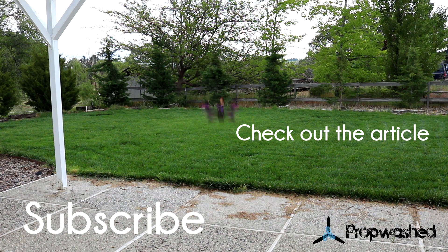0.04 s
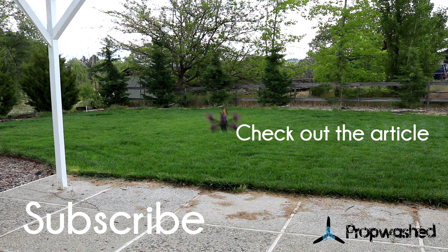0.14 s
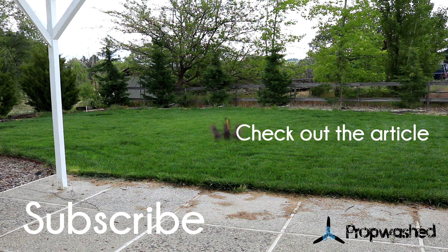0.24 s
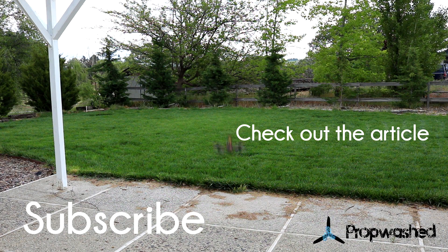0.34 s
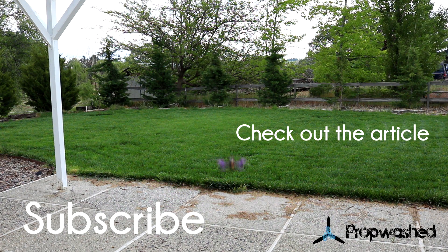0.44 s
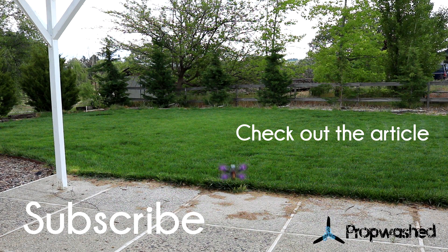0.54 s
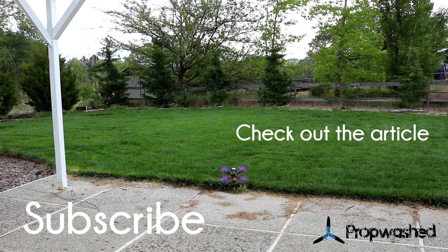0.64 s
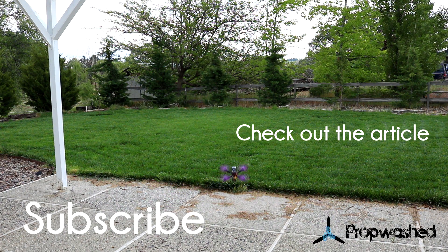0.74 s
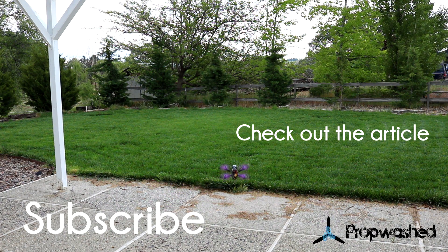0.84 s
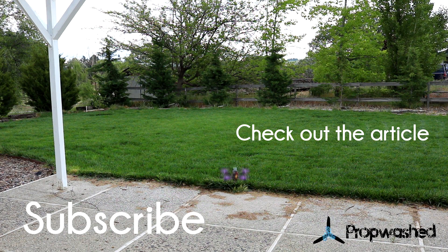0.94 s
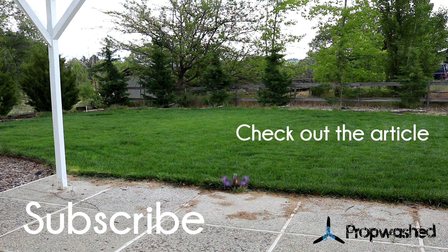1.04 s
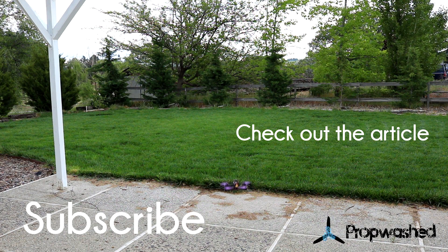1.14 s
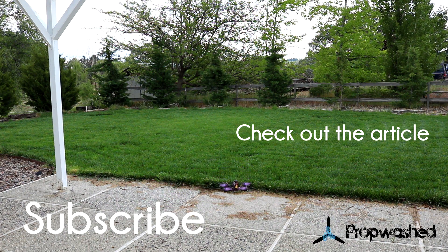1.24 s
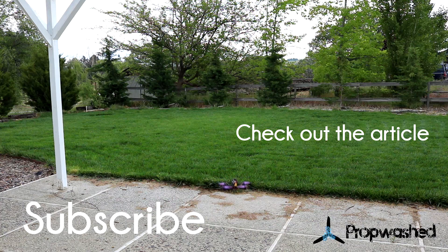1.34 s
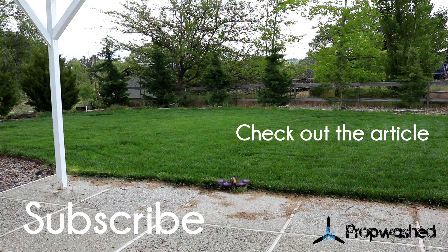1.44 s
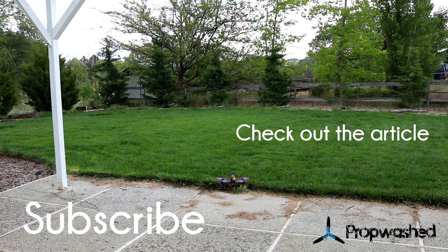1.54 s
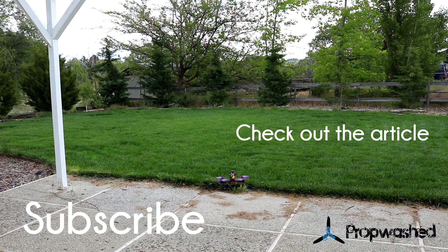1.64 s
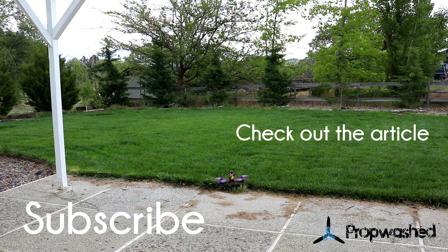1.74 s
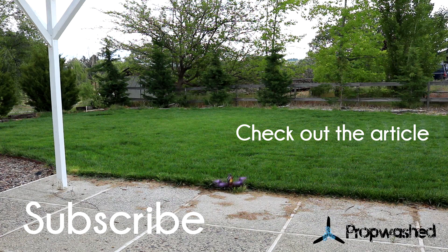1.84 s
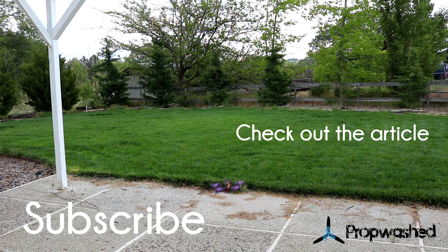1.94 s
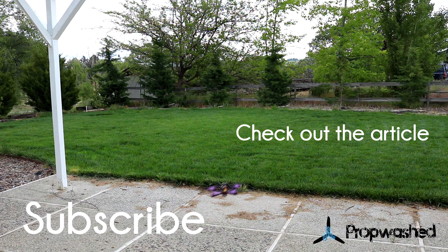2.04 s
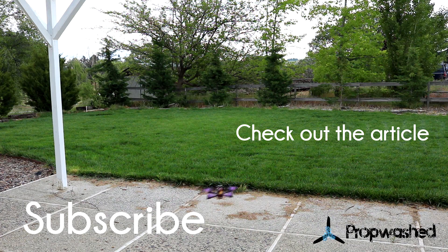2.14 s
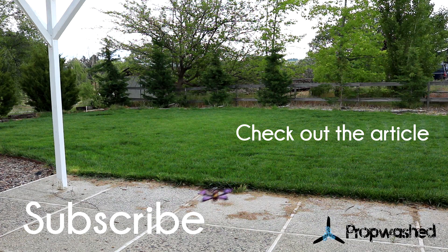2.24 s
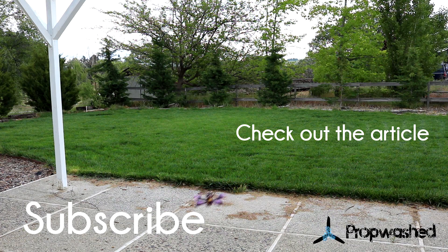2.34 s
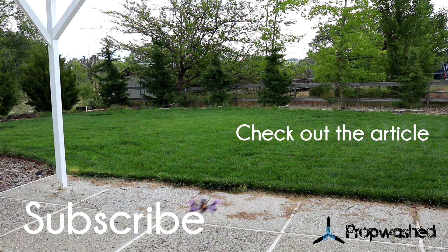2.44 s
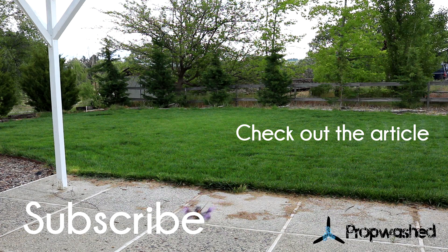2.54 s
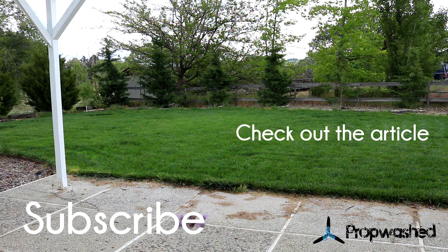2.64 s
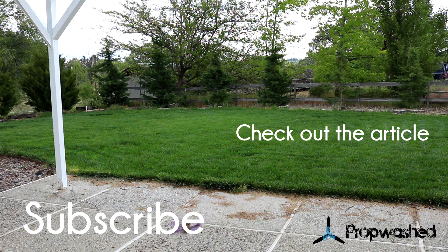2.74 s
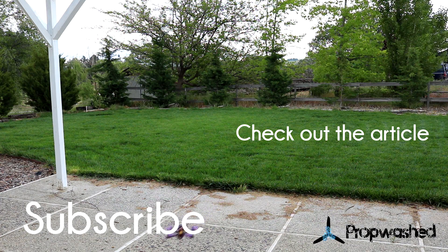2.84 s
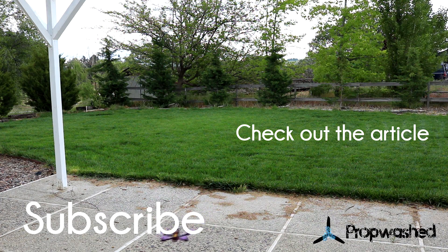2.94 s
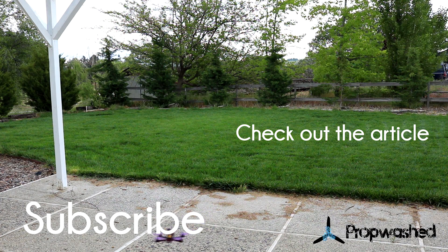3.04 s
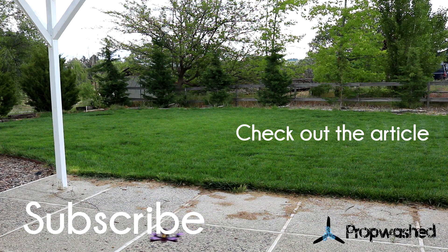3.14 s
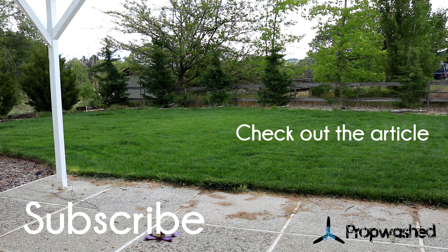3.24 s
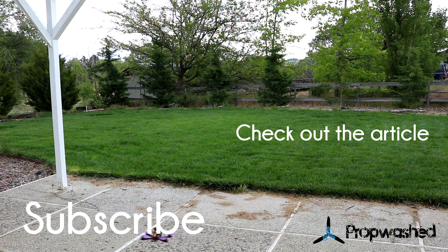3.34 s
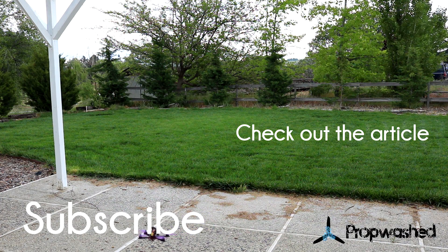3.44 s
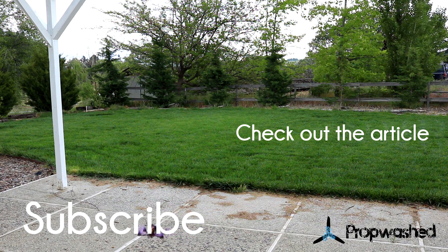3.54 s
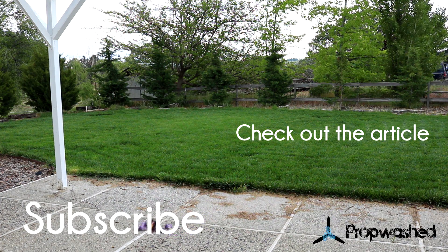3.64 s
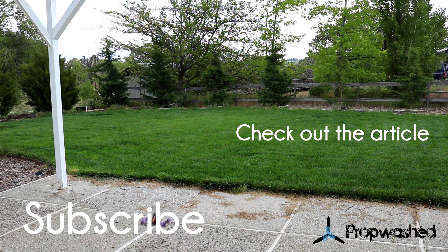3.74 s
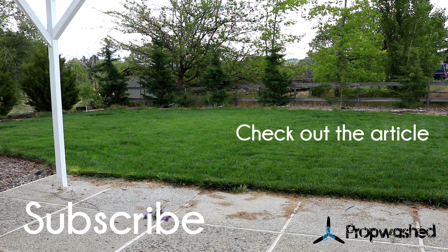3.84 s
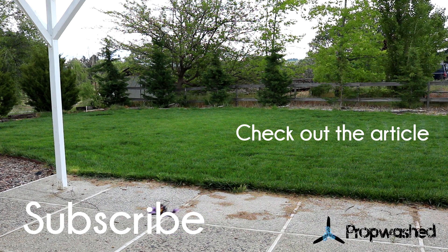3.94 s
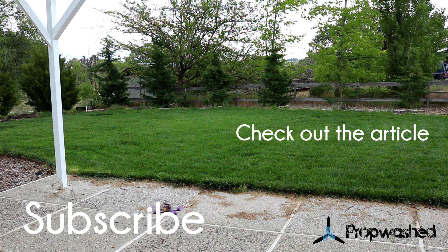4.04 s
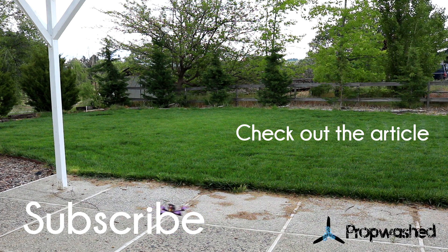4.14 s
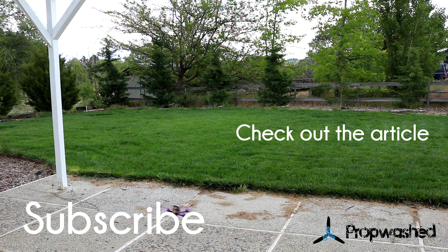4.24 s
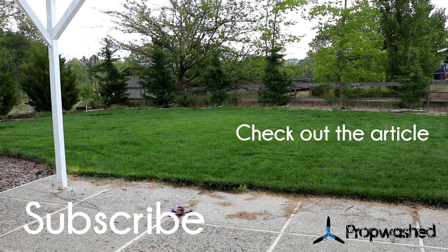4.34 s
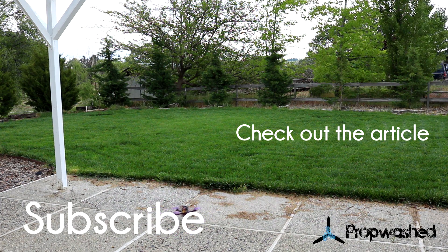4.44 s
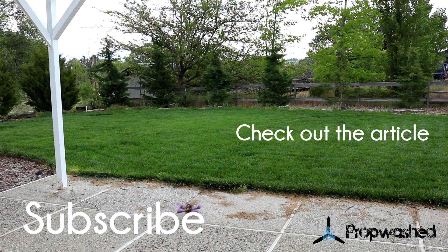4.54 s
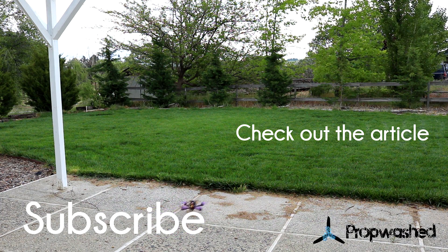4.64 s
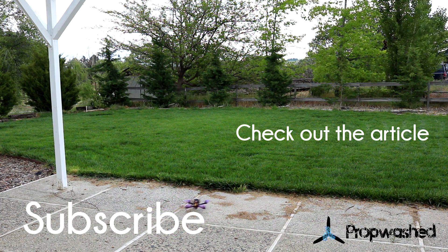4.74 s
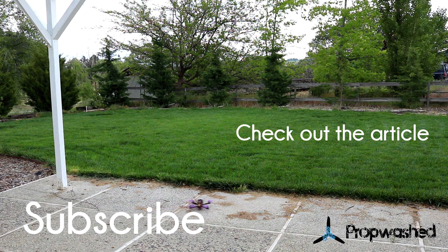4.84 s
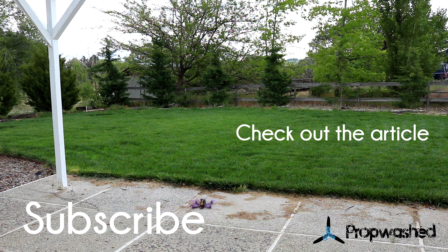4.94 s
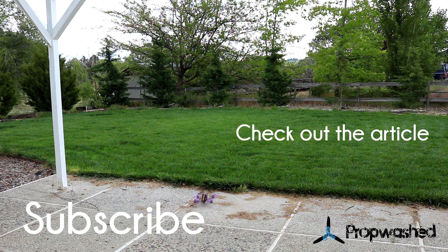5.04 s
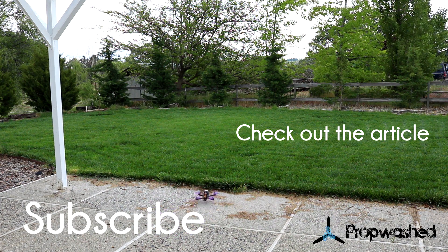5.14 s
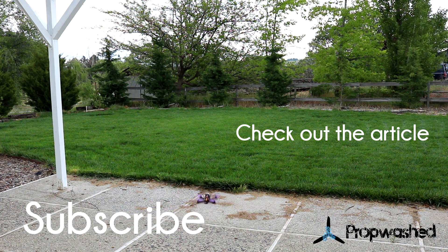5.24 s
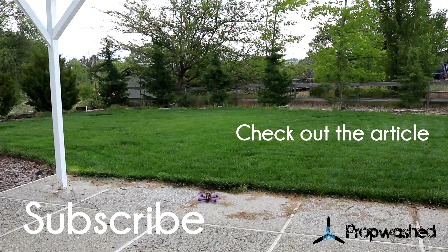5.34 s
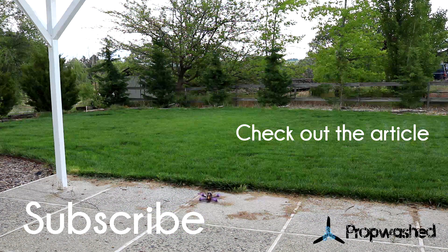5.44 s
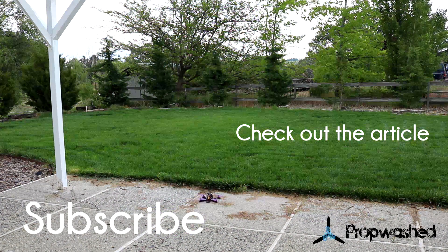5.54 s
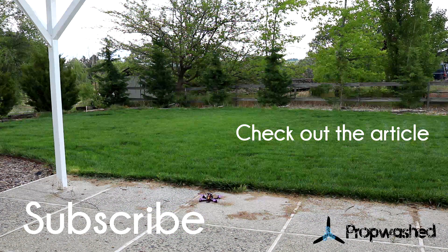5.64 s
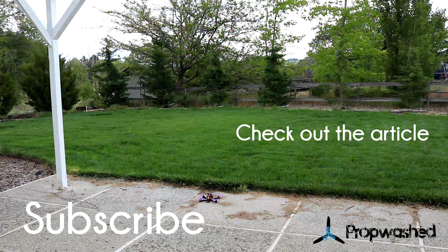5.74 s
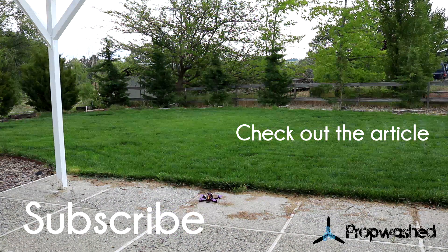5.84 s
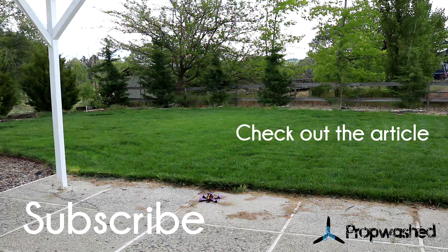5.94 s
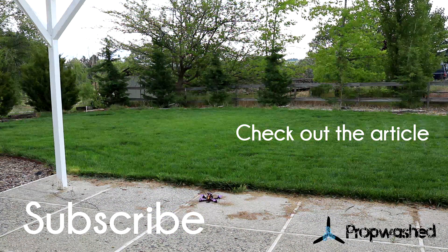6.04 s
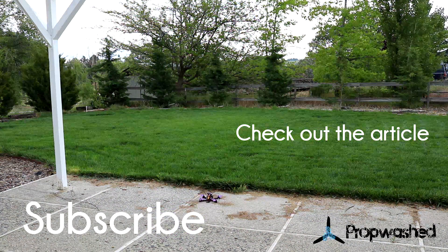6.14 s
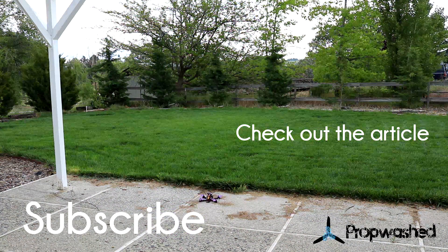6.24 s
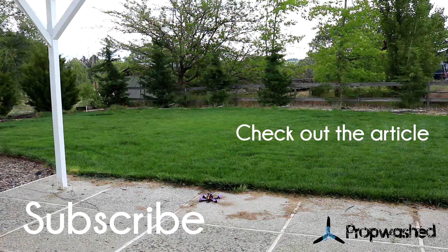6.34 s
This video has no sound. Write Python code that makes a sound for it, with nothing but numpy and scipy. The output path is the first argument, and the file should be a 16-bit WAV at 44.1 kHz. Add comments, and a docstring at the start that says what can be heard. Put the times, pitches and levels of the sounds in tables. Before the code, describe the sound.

A small drone buzzes and hisses with wavering pitch outdoors, then scuffs and clatters down onto paving as its motors stop.

```python
"""A small drone lands on a patio.

Four rotors with four blades each buzz and hiss in over a lawn, then hover low over the paving.
They drift apart in speed, so their tones throb against each other. At touchdown the blades scuff
the paving and the frame bounces twice, ringing. A quiet yard with a distant bird remains."""
import sys
import numpy as np
from scipy import signal
from scipy.fft import rfft, irfft
from scipy.io import wavfile
from scipy.ndimage import uniform_filter1d, map_coordinates

SR = 44100
rng = np.random.default_rng(int(sys.argv[2]) if len(sys.argv) > 2 else 0)


def store_pcm(level_fs):
    """Save levels as 16-bit WAV."""
    pcm = np.round(np.clip(level_fs, -1, 1) * 32767).astype(np.int16)
    wavfile.write(sys.argv[1], SR, np.atleast_2d(pcm).T)


N = 281799


def amp(db):
    """Turns decibels into a number to multiply by."""
    return 10 ** (np.asarray(db) / 20)


def evened(x):
    """Scales a signal to an average power of 1."""
    return x / np.sqrt(np.mean(x ** 2) + 1e-20)


def read(points, hz):
    """Looks up a table by frequency, on a scale of octaves."""
    f, value = np.transpose(points)
    return np.interp(np.log(hz + 1), np.log(f + 1), value)


def track(rows, t):
    """Looks up each column of a table at the times t."""
    s, *columns = np.transpose(rows)
    return [np.interp(t, s, c) for c in columns]


def add(mix, s, sound):
    """Mixes a sound in at s seconds."""
    part = mix[round(s * SR):][:len(sound)]
    part += sound[:len(part)]


def wander(t, hz):
    """A smooth random wobble that changes about hz times a second."""
    steps = signal.convolve(rng.standard_normal(5200), np.hanning(9), "same")
    return np.interp(t * hz * 4, np.arange(5200), evened(steps))


def coloured(x, shape):
    """Gives noise the bass and treble of a table, at power 1."""
    size = x.shape[-1]
    return evened(irfft(rfft(x) * amp(read(shape, np.fft.rfftfreq(size, 1 / SR))), size))


# How often a blade passes on the two middle rotors: t/s, f/Hz
THROTTLE = [(0, 779), (.04, 771), (.075, 910), (.11, 797), (.22, 520.5), (.29, 393.8), (.45, 726),
            (.55, 896), (.63, 923.5), (.72, 873), (.8, 742.6), (.93, 408), (1.06, 681), (1.14, 731.3),
            (1.25, 698), (1.5, 613.4), (1.8, 530.7), (1.87, 554.3), (2.01, 664), (2.1, 657), (2.24, 580),
            (2.35, 549), (2.6, 620.2), (2.95, 642), (3.08, 634), (3.25, 575), (3.36, 584), (3.55, 650),
            (3.78, 609), (4.03, 529.2), (4.32, 620), (4.52, 645.3), (4.72, 516.6), (4.92, 453.6),
            (4.96, 764.3), (5.16, 389)]
# Steering spreads the speeds: t/s, fastest rotor above the middle/%, slowest below/%
STEERING = [(0, 5.8, 2.3), (.04, 12, 7), (.075, 3.5, 23.2), (.115, 3.17, 3), (.2, 10, 9), (.29, 15, 9),
            (.45, 8.5, 12), (.62, 3.9, 11.6), (.74, 3, 8), (.8, 3.8, 10.5), (.93, 6.7, 6.34),
            (1.1, 1.87, 2.92), (1.38, 6.5, 4.1), (1.85, 2.08, 0.87), (2.03, 3.15, 2.82), (2.4, 1, 0.98),
            (3., 1.91, 2.78), (3.27, 2, 1), (3.46, 10, 2.97), (3.9, 4.4, 4.66), (4.12, 2.35, 6.94),
            (4.5, 2.55, 4.9), (4.92, 3.67, 2.8), (4.96, 14.3, 16.7), (5.16, 12, 16)]
# Rotors get unsteady in their own stirred-up air: t/s, raggedness/0-1
RAGGED_AIR = [(0, .35), (.13, .4), (.25, .9), (.42, .95), (.6, .5), (.72, .5), (.85, .8), (1., .75),
              (1.08, .38), (1.6, .55), (1.9, .5), (2.05, .3), (3., .3), (3.3, .5), (3.55, .65), (4.4, .75),
              (4.7, .95), (5., 1.)]
# Loudness at hover speed as the drone tilts, comes and goes:
# t/s, overall level/dB, extra for the tone/dB, extra for overtones/dB, their slope/dB per octave
NEARNESS = [(0, -35, -5.5, -6.5, -3), (.06, -36.5, -8.5, -7, -5), (.13, -38, -1, -6.5, -2),
            (.25, -39, -17.5, -4.5, -2), (.32, -37, -20, -9, -12), (.42, -39, -16.5, -12.5, 6),
            (.47, -38, -9, -6, 1.5), (.54, -36.5, -14, -10.5, 1), (.77, -42.5, -4.5, -4, 1.5),
            (.83, -40.5, -12.5, -10, -3), (1.02, -37.5, -12, -12.5, -1.5), (1.08, -41, -6, -6.5, 2),
            (1.34, -39, -7.5, -7.5, -3), (1.7, -41, -15, -10, 0.5), (2.1, -40, -10.5, -10, 0),
            (2.5, -39.5, -7, -9, 0.5), (2.7, -38, -3.5, -6, 0), (2.9, -36, -12, -9, -0.5),
            (3.08, -37.5, -6, -8.5, -3), (3.25, -38, -10.5, -6.5, -2), (3.45, -37.5, -12, -6, -0.5),
            (3.7, -40, -13, -10, 1), (3.9, -41, -20.5, -11.5, 1), (4.3, -37.5, -16.5, -8, -2.5),
            (4.75, -40, -23, -3.5, -2.5), (4.92, -38.5, -17, -5, -1.5), (5., -38, -6.5, -1.5, 1),
            (5.14, -46, -50, 3, -7.5)]
BLADES, HOVER_HZ, INERTIA_S = 4, 620, .02
SPEED_DB_PER_OCTAVE = 13.5  # faster rotors are louder


def rotors():
    """Four rotors chop the air at slightly different rates; returns their tones and their hiss."""
    t = np.arange(round(THROTTLE[-1][0] * SR)) / SR
    middle = uniform_filter1d(track(THROTTLE, t)[0], round(INERTIA_S * SR), mode="nearest")
    above, below = track(STEERING, t)
    ragged = track(RAGGED_AIR, t)[0]
    level_db, tone_db, lift_db, slope_db = track(NEARNESS, t)
    swells_db = [lift_db + 1.3 * wander(t, 9) for _ in range(17)]  # each overtone swells on its own
    fast, slow = middle * (1 + above / 100), middle * (1 - below / 100)
    drifting = middle * (1 + .025 * ragged * wander(t, 3))
    tone, whine, shake, pulsing = np.zeros((4, len(t)))
    for hz, db in [(fast, -1.5), (middle, .1), (drifting, -6), (slow, -2.5)]:
        unsteady_hz = hz * (1 + .035 * ragged ** 3 * wander(t, 45))
        phase = 2 * np.pi * (np.cumsum(unsteady_hz) / SR + rng.random())
        tone += amp(db + 4.1 * ragged * wander(t, 5.2)) * np.cos(phase)
        whine += amp(db) * blade_overtones(t, hz, phase, ragged, swells_db, slope_db)
        shake += amp(db) * shaft_shake(t, middle, phase)
        whine += amp(db) * motor_whine(t, hz, phase, ragged)
        pulsing += np.cos(phase)
    whine *= amp(-6 * ragged ** 3)
    level = amp(level_db + SPEED_DB_PER_OCTAVE * np.log2(middle / HOVER_HZ))
    level *= np.clip((t[-1] - t) / .095, 0, 1)  # the motors stop after touchdown
    shake *= np.clip((t[-1] - t) / .28, 0, 1)
    return level * (amp(tone_db) * tone + whine) + shake, level * air_hiss(t, ragged, pulsing)


# Strength of the blade overtones: f/Hz, level/dB
OVERTONES = [(900, -6), (1300, -1.5), (2000, -2), (2700, -.5), (3500, -0.5), (4300, -1.5), (5200, -3.5),
             (6200, -6), (8000, -8), (11000, -25)]
# Sound bouncing off the ground as the drone comes in low: t/s, delay/ms, share of the direct sound
GROUND_BOUNCE = [(0.9, .41, 0), (1.08, .41, .75), (1.4, .42, .45), (1.8, .55, .3), (2.05, .58, .7),
                 (2.3, .62, .2), (2.5, .62, 0)]


def blade_overtones(t, hz, phase, ragged, swells_db, slope_db):
    """The buzz: multiples of the blade rate flutter in gusts, the high ones most."""
    gust_clock = np.cumsum(.5 + 1.5 * ragged ** 2) / SR  # runs faster in ragged air
    delay_ms, share = track(GROUND_BOUNCE, t)
    buzz = np.zeros(len(t))
    for k in range(2, 17):
        blur = ragged * min(.65 + .07 * k, 1)
        angle, gust_hz = k * phase + .3 * k * k, 25 + 6 * k
        wave = (np.sqrt(1 - blur ** 2) + blur * wander(gust_clock, gust_hz)) * np.cos(angle)
        wave += blur * wander(gust_clock, gust_hz) * np.sin(angle)
        # the bounce boosts some overtones and weakens others
        comb = abs(1 + share * np.exp(2j * np.pi * k * hz * delay_ms / 1000)) / np.sqrt(1 + share ** 2)
        buzz += amp(read(OVERTONES, k * hz) + swells_db[k] + slope_db * np.log2(k / 3)) * wave * comb
    return buzz


# Low tones from uneven blades: multiple of the shaft's turning rate, level/dB
SHAFT_TONES = [(1, -4), (2, -7.5), (3, -9.5), (5, -60), (6, -6.5)]


def shaft_shake(t, blade_hz, phase, frame_hz=162, width_hz=30):
    """Unbalanced shafts shake the frame, most when they turn near its natural rate."""
    shake = amp(-64.5) / np.sqrt(1 + (2 * (blade_hz / BLADES - frame_hz) / width_hz) ** 2)
    return shake * sum(amp(db + 2.3 * wander(t, 6)) * np.cos(multiple * phase / BLADES)
                       for multiple, db in SHAFT_TONES)


def motor_whine(t, blade_hz, phase, ragged, tugs_per_turn=42, frame_hz=5634, width_hz=160):
    """Tiny tugs from the motor's slots ring the frame when they match its pitch."""
    match = 1 / (1 + (2 * (tugs_per_turn * blade_hz / BLADES - frame_hz) / width_hz) ** 2)
    calm = np.maximum(1 - (ragged / .76) ** 4, 0)
    return amp(2.3 + 2.33 * wander(t, 33)) * match * calm * np.cos(tugs_per_turn * phase / BLADES)


# Hiss of the blade tips: f/Hz, level/dB
TIP_HISS = [(150, -21.5), (400, -17), (1000, -11.5), (2000, -3.5), (3500, 0), (6000, -1.5), (9000, -1),
            (12000, -6.5), (15500, -11.5)]
# Rush of air drawn back through the rotors: f/Hz, level/dB
WASH = [(200, -37), (500, -7.5), (1200, -5), (2500, 4.5), (4500, -12), (9000, -30)]


def air_hiss(t, ragged, pulsing):
    """The tips hiss in time with the blades; ragged air adds a rush."""
    tips = coloured(rng.standard_normal((3, len(t))), TIP_HISS) * amp(.28 * pulsing)
    wash = coloured(rng.standard_normal((3, len(t))), WASH) * amp(-5.5) * ragged ** 2
    return (tips + wash) * amp(.7 * wander(t, 30))


# Background noise of the yard: f/Hz, level/dB
YARD_NOISE = [(15, -36), (25, -33), (43, -10), (140, -8.5), (169, -11), (370, -9), (512, -11), (670, -12.5),
              (746, -12), (1680, -14.5), (4420, -13.5), (5060, -16), (15700, -29.5)]
# How alike the yard sounds left and right: f/Hz, likeness/-1 to 1
YARD_LIKENESS = [(60, 0.59), (240, 0.67), (950, 0.32), (3770, -0.42), (15000, 0.055)]
# A far engine: f/Hz, width/Hz, level/dB
ENGINE_HUM = [(89.3, 29, -82.5)]


def yard(level_db=-61.5):
    """Far traffic, leaves and faint hiss swell a little over an engine's hum."""
    hz = np.fft.rfftfreq(N, 1 / SR)
    left, other = rfft(rng.standard_normal((2, N)))
    same = np.clip(read(YARD_LIKENESS, hz), -1, 1)
    right = same * left + np.sqrt(1 - same ** 2) * other
    noise = evened(irfft(amp(read(YARD_NOISE, hz)) * np.array([left, right]), N))
    hum = sum(amp(db) * evened(irfft(left / (1 + (2 * (hz - f) / width) ** 4), N))
              for f, width, db in ENGINE_HUM)
    return amp(level_db + 1.5 * wander(np.arange(N) / SR, 2.41)) * noise + hum


# Blades scuffing the paving:
# t/s, rise/s, level/dB, drag/s, change during the drag/dB, time to fade 60 dB after it/s, tail/dB
SCUFFS = [(4.915, 0.041, -33.5, 0.068, -9, 0.38, -14), (5.2709, 0.0025, -34, 0.0082, -11, 0.37, -41),
          (5.284, .002, -34, 0.1, -8.5, 0.41, -44), (5.503, 0.0011, -45, .01, -6, .1, -37),
          (5.518, 0.0012, -31.5, 0.034, -20, 0.23, -53)]
# Sound of the grit: f/Hz, level/dB
GRIT = [(88, -57), (150, -24), (511, -9), (633, -6.5), (815, -14), (990, -4.5), (1380, -2.5), (2160, -1.5),
        (2620, 0), (8420, 1.5), (15700, -15.5)]


def scuffs(dulling_s=.065, tail_fade_s=1., rattle_db=-14):
    """Blades drag over grit, bright at first and then dull, and set the frame ringing."""
    t = np.arange(N) / SR
    high_power, low_power = np.zeros((2, N))
    noise = rng.standard_normal((3, N))
    grains = amp(1.4 * rng.standard_normal(N // 40 + 1).repeat(40)[:N])
    grit = coloured(noise * grains, GRIT)
    low = signal.lfilter(*signal.butter(1, 1500, fs=SR), grit)
    for s, rise, db, drag, loss_db, fade_s, tail_db in SCUFFS:
        after = np.maximum(t - s - rise, 0)
        attack = np.clip((t - s) / rise, 0, 1) ** 2
        decay = amp(loss_db * np.minimum(after / drag, 1) - 60 * np.maximum(after - drag, 0) / fade_s)
        tail = amp(tail_db - 60 * after / tail_fade_s)
        level = amp(db) * attack * (decay + tail)
        bass_db = 12.5 - 14 * np.exp(-after / dulling_s)
        high_power += level ** 2
        low_power += (level * amp(bass_db)) ** 2
    scrape = np.sqrt(high_power) * (grit - low) + np.sqrt(low_power) * low
    ring = frame_ring(t[:4000])
    rattle = signal.oaconvolve(scrape, ring[None] / np.linalg.norm(ring), axes=1)[:, :N]
    return scrape + amp(rattle_db) * rattle


# The frame's own notes: f/Hz, level/dB, time to fade 60 dB/s
FRAME_NOTES = [(2710, -8.5, 0.046), (4160, -10, 0.017), (5530, -0.5, 0.035), (6600, 1, 0.009),
               (8100, -10, 0.0087), (10750, 11, 0.0043)]


def frame_ring(t):
    """After one blow the frame rings with a few fast-fading notes."""
    return sum(amp(db - 60 * t / fade_s) * np.sin(2 * np.pi * hz * t) for hz, db, fade_s in FRAME_NOTES)


# The frame hits the paving: t/s, level/dB, f/Hz, time to fade 60 dB/s, crack against the ring/dB
KNOCKS = [(4.931, -22.5, 5600, 0.034, -13), (4.946, -32, 1500, .03, -6), (5.271, -34, 4300, 0.014, 2),
          (5.287, -18.5, 7000, .012, 1.7), (5.309, -26, 5700, 0.047, -16), (5.316, -28, 5200, 0.042, -11),
          (5.352, -34.5, 2740, 0.099, -14), (5.395, -28, 816, 0.026, -2), (5.504, -38, 5000, .02, -3),
          (5.518, -30.5, 2710, 0.052, -0.5), (5.529, -59, 1360, 0.34, -20)]
# Soft low bumps: t/s, level/dB, f/Hz
BUMPS = [(5.287, -45, 396), (5.81, -58, 487), (5.847, -62, 463), (5.898, -63, 520), (6.26, -66, 170),
         (6.348, -55, 337)]


def knocks():
    """Each hit is a crack, a ring of its own pitch and the frame's notes; soft bumps join in."""
    out, t = np.zeros(N), np.arange(6000) / SR
    noises = rng.standard_normal((len(KNOCKS), len(t)))
    cracks = signal.lfilter(*signal.butter(2, 1800, "high", fs=SR), noises) * amp(-60 * t / .005)
    for (s, db, hz, fade_s, crack_db), crack in zip(KNOCKS, cracks):
        ring = np.sin(2 * np.pi * hz * t) * amp(-60 * t / fade_s) * (1 - np.exp(-t / .00038))
        add(out, s, amp(db) * (.8 * ring + amp(crack_db) * (.36 * frame_ring(t) + crack)))
    for s, db, hz in BUMPS:
        add(out, s, amp(db) * bump(t, hz))
    return signal.lfilter(*signal.butter(2, 170, "high", fs=SR), out)  # a light frame moves little bass


def bump(t, hz):
    """One soft low swing that dies at once."""
    wave = amp(-60 * t / .025) * np.sin(2 * np.pi * hz * t) * (1 - np.exp(-t / .0013))
    return wave / abs(wave).max()


# The bird's chirps: t/s, length/s, start f/Hz, middle f/Hz, end f/Hz, level/dB
CHIRPS = [(5.75, .02, 3980, 3830, 3800, -80), (5.819, 0.018, 4000, 3880, 3600, -65),
          (5.887, .025, 4030, 3930, 3800, -66), (6.017, 0.076, 4200, 4470, 3750, -63),
          (6.085, .025, 3800, 3900, 4100, -63), (6.275, .025, 3880, 3800, 3700, -69)]


def bird():
    """A distant bird gives short, sliding whistles."""
    out = np.zeros(N)
    for s, length, *hz, db in CHIRPS:
        progress = np.linspace(0, 1, round(length * SR))
        glide = np.polyval(np.polyfit([0, .5, 1], hz, deg=2), progress)
        level = amp(db + 3 * wander(progress * length, 97)) * np.sin(np.pi * progress)
        add(out, s, level * np.sin(2 * np.pi * np.cumsum(glide) / SR))
    return out


def echoes(x, patterns=8, changes_per_s=9, fade_s=.06):
    """Paving and roof throw echoes that shift as the drone moves; rows are direct, left, right."""
    t, place = np.arange(8000) / SR, np.arange(N) / SR * changes_per_s % patterns
    out = np.array([x, 0 * x, 0 * x])
    for k in range(patterns):
        taps = rng.choice([-1., 1.], (2, len(t))) * (rng.random((2, len(t))) < .06)
        taps *= amp(-60 * t / fade_s)
        taps /= np.linalg.norm(taps, axis=1, keepdims=True)
        apart = np.abs((place - k + patterns / 2) % patterns - patterns / 2)
        blend = np.cos(np.pi / 2 * np.minimum(apart, 1))
        out[1:] += signal.oaconvolve((x * blend)[None], taps, axes=1)[:, :N]
    return out


# How alike the drone sounds left and right: f/Hz, likeness/0-1
DRONE_LIKENESS = [(60, .75), (150, .8), (380, .92), (950, .88), (2400, .68), (6000, .56), (10000, .46),
                  (15000, .28)]
# Which side is louder at each pitch: f/Hz, left over right/dB
BALANCE = [(60, -2), (150, 0.5), (380, 2), (950, 3), (2380, -2.5), (5980, 2.5), (15000, 4)]
# The drone's direction: t/s, left arrives earlier/microseconds, left over right/dB
BEARING = [(0, 9, -2.1), (2, -2, -2), (2.5, 10, -2.1), (3.2, 38, -2.3), (3.7, 39, -1), (4.2, 21, -1.7),
           (5, 15, -1.5), (6.4, 18, -1.5)]


def patio(rows):
    """Blends direct and scattered sound into stereo; the treble is scattered most."""
    hz, samples = np.fft.rfftfreq(N, 1 / SR), np.arange(N)
    same, sides = np.clip(read(DRONE_LIKENESS, hz), 0, 1), np.array([[.5], [-.5]])
    lead_us, pan_db = track(BEARING, samples / SR)
    direct = [map_coordinates(rows[0], [samples + side * lead_us * SR / 1e6], order=5) for side in sides]
    heard = np.sqrt(same) * rfft(direct) + np.sqrt(1 - same) * rfft(rows[1:])
    return irfft(heard * amp(sides * read(BALANCE, hz)), N) * amp(sides * pan_db)


def scene():
    """The drone flies in and lands, with the yard and the bird behind it."""
    tones, hiss = rotors()
    tones = np.pad(tones, (0, N - len(tones)))
    hiss = np.pad(hiss, [(0, 0), (0, N - hiss.shape[1])])
    hits = echoes(knocks()) * amp([[2.5], [-4], [-4]])  # nearby hits arrive mostly direct
    drone = patio(echoes(tones) + hiss + scuffs() + hits)
    return drone + bird() * amp([[-1.5], [1.5]]) + yard()


def record(dry, edge_hz=15800):
    """Cuts off the very highest treble."""
    return signal.oaconvolve(dry, signal.firwin(511, edge_hz, window=("kaiser", 9), fs=SR)[None], "same")


dry = scene()
out = record(dry)
store_pcm(out)
```